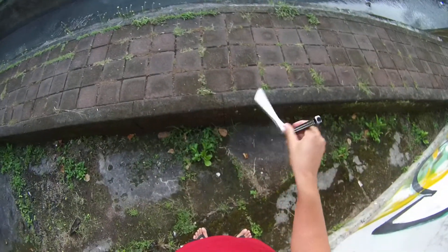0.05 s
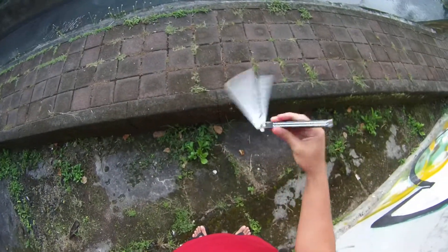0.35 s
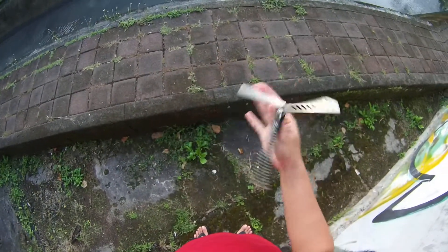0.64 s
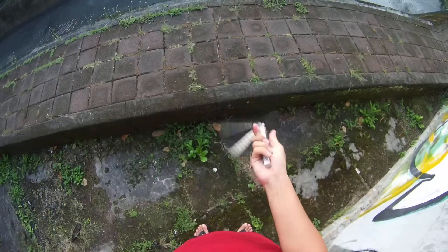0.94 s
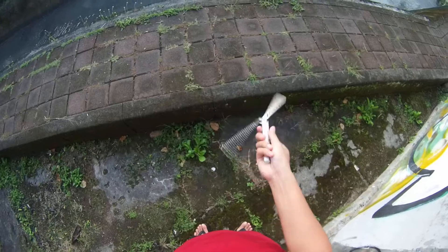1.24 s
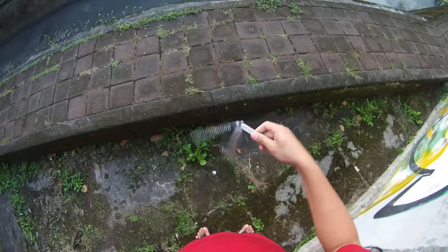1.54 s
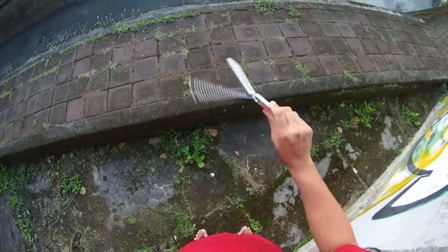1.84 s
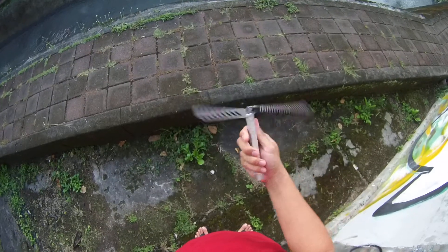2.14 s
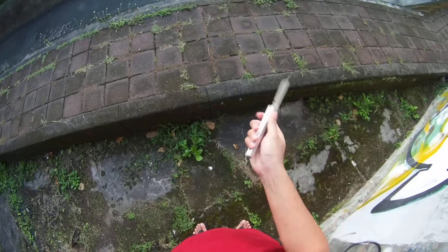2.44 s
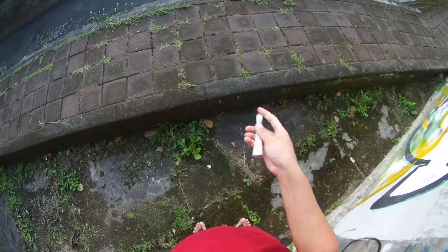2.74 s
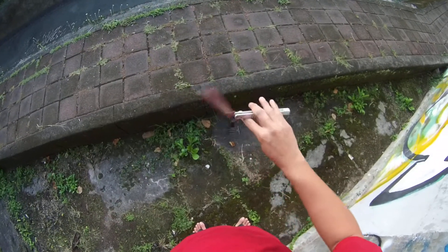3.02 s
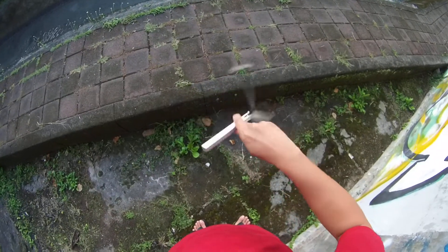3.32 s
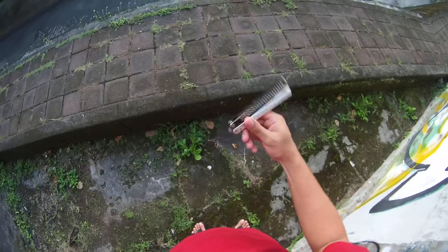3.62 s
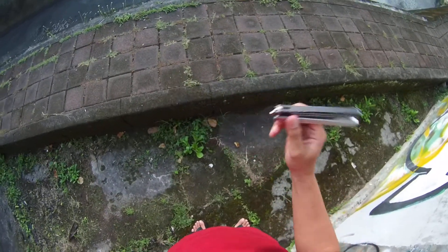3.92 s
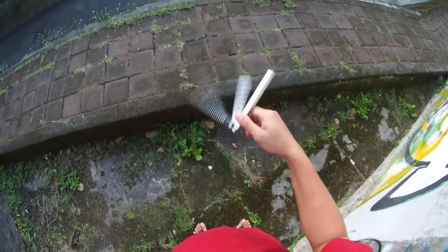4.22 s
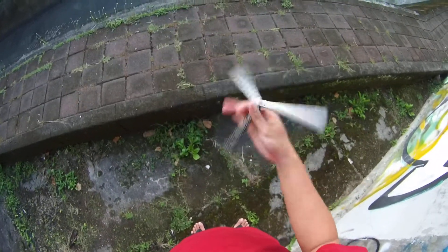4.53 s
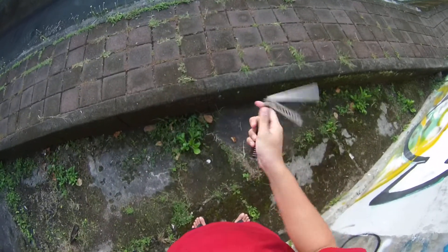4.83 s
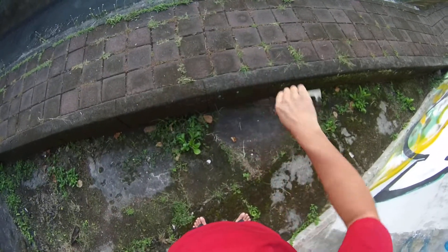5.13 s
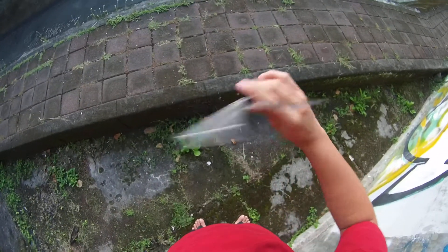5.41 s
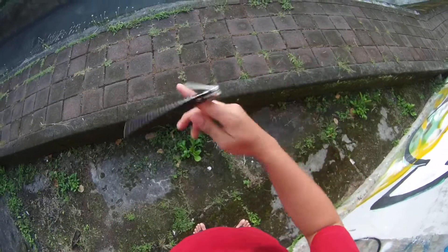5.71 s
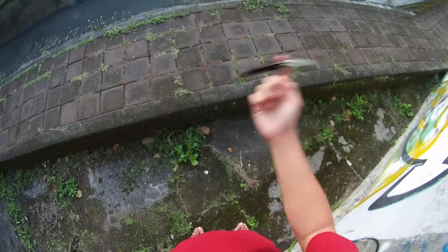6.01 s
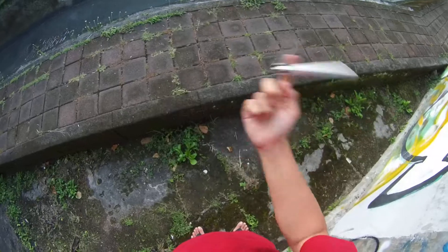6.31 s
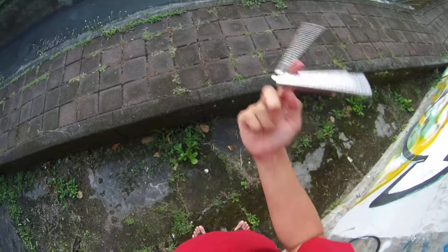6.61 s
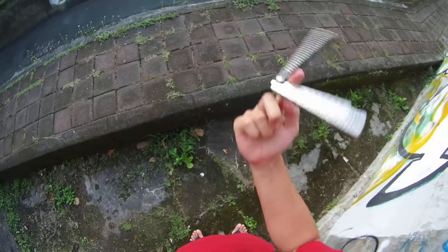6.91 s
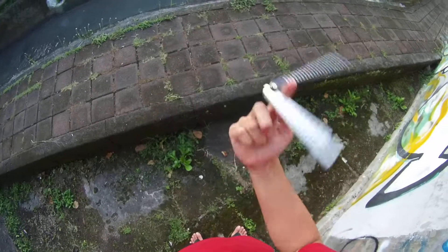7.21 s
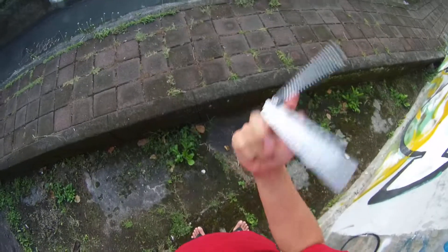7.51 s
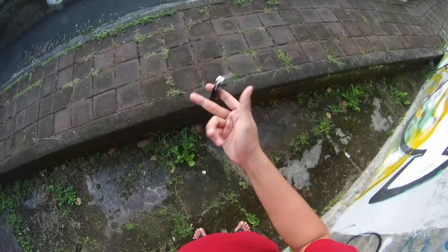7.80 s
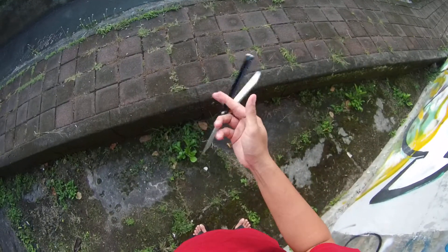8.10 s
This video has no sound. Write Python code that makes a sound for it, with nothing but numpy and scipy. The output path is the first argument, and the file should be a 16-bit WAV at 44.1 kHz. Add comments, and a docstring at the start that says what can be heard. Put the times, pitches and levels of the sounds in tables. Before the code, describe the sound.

Outdoors, low traffic rumble and tyre noise swell and ease while a butterfly knife snaps open and shut close by, giving sharp metal clicks with a short ring and slight echo. One dry snap comes early. A motorbike passes with a low, rasping exhaust halfway through. Near the end the clicks turn softer, a farther engine hums, and a horn beeps once in the distance.

```python
"""Street traffic rumbles throughout, swelling with engine roar and tyre noise. Close by, from 0.6 s, a
butterfly knife is flipped in one hand: handles clack, steel rings and rebounds, and paving and a wall
throw each click back. One dry snap comes at 1.4 s. A motorbike booms and rasps past, nearest just
before 4 s. From 5.9 s a farther engine drones, rising in pitch, and at 7 s a distant horn gives one
short beep off the house fronts, ahead of the knife's last soft clicks."""
import sys
import numpy as np
from scipy import signal
from scipy.fft import rfft, irfft
from scipy.io import wavfile
from scipy.ndimage import uniform_filter1d, map_coordinates

SR = 44100
rng = np.random.default_rng(int(sys.argv[2]) if len(sys.argv) > 2 else 0)


def master(y):
    """Save y as 16-bit WAV."""
    cut = np.clip(np.atleast_2d(y).T, -1, 1)
    pcm = np.round(cut * 32767)  # scale
    wavfile.write(sys.argv[1], SR, pcm.astype(np.int16))


N = 359415
TIME = np.arange(N) / SR

# EQ curve of the street bed: frequency_hz, gain_db
STREET_EQ = [(15, -46), (25, 3), (55, -4.5), (82, 1.5), (107, -4.5), (140, -6.5), (204, -13), (221, -16.5),
             (421, -16.5), (495, -21), (826, -20), (1340, -30), (1660, -34.5), (1950, -41), (15500, -55)]
# vehicles going by in the traffic: peak_s, roar_boost_db, tyre_boost_db
TRAFFIC_SWELLS = [(1.7, 3.5, 1), (2.45, 1, 4.5), (3.2, 1, 2), (3.9, 9, 0.5), (4.75, 0, 5), (5.5, 4, 1.5),
                  (6.9, 1.5, 2.3), (7.8, 3.5, 1)]
# metal-on-metal hits of the knife: start_s, clack_db, clack_centre_hz, ring_db
KNIFE_HITS = [(0.5841, -40, 3470, -33.5), (1.0996, -44, 4300, -51), (1.106, -62, 3630, -48),
              (1.2848, -45.5, 3700, -71.5), (1.353, -34.5, 3750, -40), (2.123, -54, 2990, -57),
              (2.3542, -32, 3340, -36.5), (2.3637, -42, 2500, -56), (2.3807, -36.5, 3240, -49),
              (2.3915, -46, 2900, -45.5), (2.4005, -44, 2450, -63), (3.1188, -30.5, 3630, -42),
              (3.128, -43, 2500, -54), (3.1597, -36, 3200, -46), (3.1664, -42, 2700, -41.5),
              (3.636, -44, 3970, -36.5), (3.676, -52, 3903, -47), (3.6918, -55, 3770, -41),
              (4.7308, -35, 3846, -37.5), (5.107, -36.5, 3100, -40.5), (5.1306, -39.5, 2835, -45),
              (5.14, -45, 2920, -42), (5.591, -48, 4990, -40.5), (5.5967, -40, 2900, -37),
              (5.601, -50, 5000, -38), (6.136, -57, 3184, -51.5), (6.547, -54, 4340, -47),
              (7.503, -54, 3920, -51.5), (7.6773, -61, 3220, -57), (7.7717, -56, 4400, -58)]
# EQ curve of the contact's gritty tick: frequency_hz, gain_db
TICK_EQ = [(500, -23), (1300, 4), (3000, 8), (6000, 3.5), (9300, 3), (11000, 0.5), (13000, -6), (14500, 4),
           (15500, -22)]
# dull modes of the handles, damped by the hand: pitch_hz, gain_db, t60_s
HANDLE_MODES = [(1915, 8.5, 0.0059), (2434, -1, 0.021), (3470, -1.5, 0.01), (3570, 3, 0.012),
                (4520, -10, 0.014), (5090, 6.5, 0.017)]
# bright modes of the steel: pitch_hz, gain_db, t60_s
STEEL_MODES = [(6560, 1, 0.02), (7020, -3, 0.0096), (7700, -9, 0.018), (7910, -4.5, 0.028),
               (7620, -10, 0.012), (8270, -13, 0.016)]
# a lone dry snap: start_s, peak_db
DRY_SNAPS = [(1.4238, -21)]
# the motorbike's revs: time_s, firing_rate_hz
BIKE_REVS = [(2.4, 44), (2.75, 46.7), (3.23, 48.5), (3.6, 53.8), (3.94, 55.0), (4.31, 54.2), (4.8, 48.0)]
# fader curve of its exhaust boom, before the dips: time_s, level_db
BOOM_FADER = [(2.55, -72), (2.81, -25), (3.2, -19.5), (3.72, -21.5), (4.22, -24), (4.45, -37), (4.9, -33),
              (5.3, -77)]
# brief dips in that boom: centre_s, depth_db
EXHAUST_DIPS = [(3.02, 14.5), (3.37, 6.5), (3.59, 6.5), (3.95, 18)]
# overtones of the firing rate that make the bike's rasp: harmonic_number, gain_db
RASP_HARMONICS = [(3, 2), (4, -8), (5, -13.5), (6, -14), (7, -21), (8, -27.5), (9, -20.5)]
# overtones of the horn's diaphragm: harmonic_number, gain_db
HORN_HARMONICS = [(6, -14), (7, 0), (8, -1.5), (9, -7.5), (10, -16), (16, -14), (17, -19)]


def amp(db):
    """Decibels to gain."""
    return 10 ** (np.asarray(db) / 20)


def unit(x):
    """Scales to rms 1."""
    return x / np.sqrt(np.mean(x ** 2) + 1e-20)


def automation(rows):
    """A breakpoint curve, read at every sample."""
    return np.interp(TIME, *np.transpose(rows))


def equalise(x, curve):
    """Shapes a sound with an EQ curve drawn on a log-frequency axis."""
    hz, db = np.transpose(curve)
    f = np.fft.rfftfreq(len(x), 1 / SR)
    return irfft(rfft(x) * amp(np.interp(np.log(f + 1), np.log(hz + 1), db)), len(x))


def wander(per_s):
    """A smooth random drift of rms 1."""
    knots = rng.standard_normal(4000)
    return unit(map_coordinates(knots, [TIME * per_s], order=3, mode="wrap"))


def envelope(start_s, length_s, attack_s, release_s):
    """Attack, hold and release."""
    t = TIME - start_s
    return np.clip(np.minimum(t / attack_s, (length_s - t) / release_s), 0, 1)


def bumps(rows, t, width_s):
    """A bell-shaped bump at each row's time, of that row's height."""
    return sum(height * np.exp(-.5 * ((t - s) / width_s) ** 2) for s, height in rows)


def decay(t, t60):
    """A tail that falls 60 dB in t60 seconds."""
    return np.exp(-np.log(1000) * t / t60)


def at_level(sound, db):
    """Sets the rms level of the first three milliseconds."""
    return amp(db) * sound / np.sqrt(np.mean(sound[:132] ** 2))


def add(mix, start_s, sound):
    """Drops a sound into the mix."""
    part = mix[max(round(start_s * SR), 0):][:len(sound)]
    part += sound[:len(part)]


def street(bed_db=-33, roar_hz=370, tyre_hz=1000, swell_s=.3, flicker_db=1.24):
    """A bed of rumble and hiss; the roar of engines and tyres swells as traffic moves."""
    bed = amp(bed_db) * unit(equalise(rng.standard_normal(N), STREET_EQ))
    hz, frame_s, spectrum = signal.stft(bed, SR, nperseg=2048)
    # both bands sink a little between vehicles
    roar_db = -2.5 + bumps([(s, db) for s, db, _ in TRAFFIC_SWELLS], frame_s, swell_s)
    tyre_db = -1.35 + bumps([(s, db) for s, _, db in TRAFFIC_SWELLS], frame_s, swell_s)
    patches = uniform_filter1d(rng.standard_normal(spectrum.shape), 6, axis=0)
    patches = unit(uniform_filter1d(patches, 14, axis=1))
    gain_db = flicker_db * patches * (hz < 2000)[:, None]  # lows and mids flicker
    for centre_hz, octaves, swell_db in ((roar_hz, .7, roar_db), (tyre_hz, .55, tyre_db)):
        band = np.exp(-.5 * (np.log2((hz + 1) / centre_hz) / octaves) ** 2)
        gain_db += band[:, None] * swell_db
    return signal.istft(spectrum * amp(gain_db), SR, nperseg=2048)[1][:N]


def rumble(db=-44):
    """A narrow sub-bass throb under the traffic."""
    sub_eq = [(20, -46), (34, -15), (41, 15), (48, -32), (80, -59), (300, -120)]
    return amp(db) * unit(equalise(rng.standard_normal(N), sub_eq))


def struck(modes, centre_hz, reach_hz, t, rise_s, detune):
    """Modes ring after a hit; where it lands favours those near one pitch."""
    hz, db, t60 = np.transpose(modes)[:, :, None]
    weight = amp(db + rng.normal(0, 0.44, hz.shape)) / (1 + ((hz - centre_hz) / reach_hz) ** 2)
    cycles = hz * (1 + detune * rng.standard_normal(hz.shape)) * t + rng.random(hz.shape)
    partials = weight * np.sin(2 * np.pi * cycles) * decay(t, t60)
    return partials.sum(0) * (1 - np.exp(-t / rise_s))


def chatter(centre_hz, width_hz, t, decay_s):
    """Loose parts rattle for a moment: a dense burst around one pitch."""
    f = np.fft.rfftfreq(len(t), 1 / SR)
    band = (1 + ((f - centre_hz) / width_hz) ** 2) ** -.8
    noise = irfft(rfft(rng.standard_normal(len(t))) * band, len(t))
    return noise * np.exp(-t / decay_s) * (1 - np.exp(-t / 0.00028))


def blend(ring, rattle, rattle_share):
    """An equal-power mix of ring and rattle."""
    return np.sqrt(1 - rattle_share) * at_level(ring, 0) + np.sqrt(rattle_share) * at_level(rattle, 0)


def afterring(t, gain_db=-25, hz=7790, spread_hz=150, t60=0.42, count=9):
    """Close modes of the thin steel beat against each other as they fade."""
    cycles = rng.normal(hz, spread_hz, (count, 1)) * t + rng.random((count, 1))
    return amp(gain_db) * unit(np.sin(2 * np.pi * cycles).sum(0)) * decay(t, t60)


def with_echoes(sound, near_db, far_db=-20, slap_db=-16, paving_s=.0098, spread_s=0.0086):
    """The direct sound, a slap off the paving, a cluster of echoes round it and a faint scatter."""
    t = TIME[:len(sound)]
    near, far = rng.standard_normal((2, len(t))) * (rng.random((2, len(t))) < .15)
    near *= np.exp(-.5 * ((t - paving_s) / spread_s) ** 2) * (t > .003)
    far *= decay(t, t60=0.39) * (t > .004)
    taps = (t == 0) + amp(near_db) * near / np.linalg.norm(near)
    taps += amp(far_db) * far / np.linalg.norm(far)
    slap_s = paving_s + rng.uniform(-.0008, .0008)  # the hand's height varies
    taps[round(slap_s * SR)] += amp(slap_db)
    return signal.fftconvolve(sound, taps)[:len(t)]


def knife(usual_ring_db=-42, knock_gain_db=-11, scrape_s=0.0027):
    """Each hit layers a gritty tick, a clack of the handles and a ring of the steel."""
    out, t = np.zeros(N), TIME[:8192]
    for start_s, clack_db, clack_hz, ring_db in KNIFE_HITS:
        # a firmer hit favours the steel's higher modes and ticks louder
        firmness_db = ring_db - usual_ring_db
        ring_hz = 7450 + 24 * firmness_db + rng.normal(0, 100)
        tick_db = -46 + 0.4 * firmness_db
        tick = equalise(rng.standard_normal(len(t)), TICK_EQ)
        tick *= np.exp(-t / scrape_s) * (1 - np.exp(-t / 0.00013))
        # the changing grip shifts the handles' modes from hit to hit
        handles = struck(HANDLE_MODES, clack_hz, 1000, t, rise_s=0.00026, detune=0.037)
        handles = blend(handles, chatter(clack_hz, 760, t, decay_s=0.00096), rattle_share=0.51)
        steel = struck(STEEL_MODES, ring_hz, 450, t, rise_s=0.00016, detune=0.0066)
        steel = blend(steel, chatter(ring_hz, 360, t, decay_s=0.0016), rattle_share=0.18)
        steel = amp(ring_db) * (at_level(steel, 0) + afterring(t))
        knock = chatter(2000, 430, t, decay_s=0.0015)  # the whole knife jolts in the hand
        body = at_level(handles, clack_db) + at_level(knock, clack_db + knock_gain_db) + steel
        add(out, start_s, with_echoes(body, near_db=-8.5))
        # the tick is beamed past the microphone, so more of it arrives as echo
        add(out, start_s, with_echoes(at_level(tick, tick_db), near_db=-3.5))
    return out


def snap(decay_s=0.00023):
    """A single sharp spike without any ring."""
    out = np.zeros(N)
    for start_s, peak_db in DRY_SNAPS:
        add(out, start_s, amp(peak_db) * np.exp(-TIME[:128] / decay_s))
    return out


def motorbike(nearest_s=3.94, approach_s=1, leave_s=.33, rasp_db=-30.5, puff_gain_db=-17):
    """Harmonics of an uneven firing rate; the second booms in the exhaust, and each firing puffs."""
    firing_hz = automation(BIKE_REVS) * (1 + 0.0116 * wander(35))
    phase = 2 * np.pi * np.cumsum(firing_hz) / SR
    boom_db = automation(BOOM_FADER) - bumps(EXHAUST_DIPS, TIME, width_s=0.043)
    boom = amp(boom_db) * unit(np.sin(2 * phase))
    buzz = np.zeros(N)
    for harmonic, db in RASP_HARMONICS:
        flutter_db = 2.5 * wander(9)
        buzz += amp(db + flutter_db) * np.sin(round(harmonic) * phase + rng.uniform(0, 2 * np.pi))
    buzz *= 1 + 0.31 * wander(60)  # strong and weak firings
    puff_eq = [(200, -3), (600, -13), (780, 1.0), (1050, -4.5), (2500, -48)]
    puffs = equalise(rng.standard_normal(N) * (1 + np.cos(phase)), puff_eq)
    rasp = unit(buzz) + amp(puff_gain_db) * unit(puffs)
    # the rasp swells slowly as the bike nears and falls fast once it is past
    past_s = TIME - nearest_s
    distance = np.hypot(1, past_s / np.where(past_s < 0, approach_s, leave_s))  # 1 at its nearest
    return boom + amp(rasp_db) * rasp / distance


def far_engine(start_s=5.9, start_hz=91, rise_hz_per_s=8.5, db=-34.5, flutter_db=2, waver=0.013):
    """One wavering exhaust note; the engine speeds up evenly while it swells, holds and fades."""
    hz = start_hz + rise_hz_per_s * (TIME - start_s)
    phase = 2 * np.pi * np.cumsum(hz * (1 + waver * wander(30))) / SR
    swell = envelope(start_s, length_s=1.72, attack_s=0.32, release_s=0.167)
    return amp(db + flutter_db * wander(14)) * swell * unit(np.sin(phase))


def horn(start_s=7.06, start_hz=479, sag_hz_per_s=40, gain_db=-46, direct_gain=0.37, air_hz=9000):
    """One sagging beep from a buzzing diaphragm, heard mostly by way of the house fronts."""
    hz = start_hz - sag_hz_per_s * (TIME - start_s)
    phase = 2 * np.pi * np.cumsum(hz * (1 + 0.013 * wander(150))) / SR
    gate = amp(gain_db) * envelope(start_s, length_s=0.15, attack_s=.022, release_s=0.037)
    out = np.zeros(N)
    for harmonic, db in HORN_HARMONICS:
        partial = amp(db) * gate * np.sin(round(harmonic) * phase)
        t60 = 0.97 / (1 + (harmonic * start_hz / air_hz) ** 2)  # high partials die first
        tail = rng.standard_normal(SR) * decay(TIME[:SR], t60)
        echo = signal.oaconvolve(partial, tail)[:N]
        out += direct_gain * partial + echo * np.linalg.norm(partial) / np.linalg.norm(echo)
    return out


def scene():
    """The knife up front, the street behind, in mono."""
    return (knife() + snap() + street() + rumble() + motorbike() + far_engine() + horn())[None]


def record(dry, low_cut_hz=35, high_cut_hz=15500):
    """The microphone's low cut, then a steep high cut."""
    f = np.fft.rfftfreq(N, 1 / SR)
    trimmed = irfft(rfft(dry) * f ** 3 / np.sqrt(f ** 6 + low_cut_hz ** 6), N)
    high_cut = signal.firwin(401, high_cut_hz, window=("kaiser", 9), fs=SR)
    return signal.oaconvolve(trimmed, high_cut[None], "same")


dry = scene()
out = record(dry)
master(out)
```